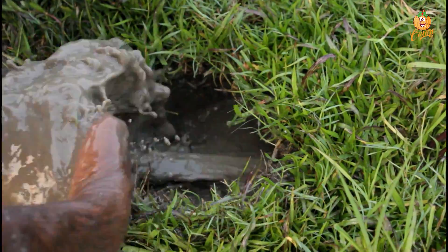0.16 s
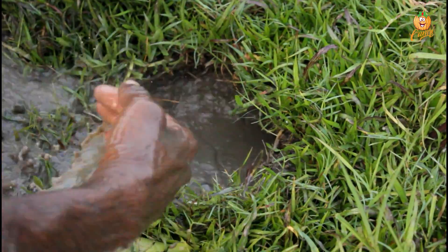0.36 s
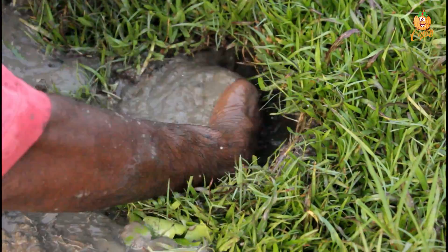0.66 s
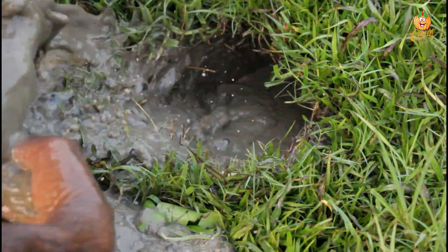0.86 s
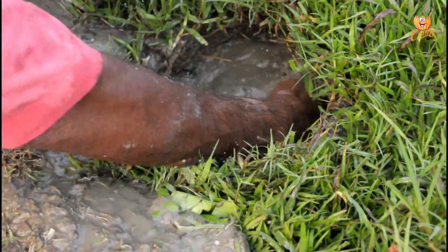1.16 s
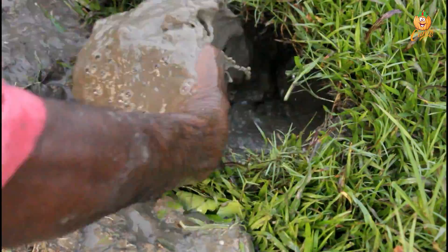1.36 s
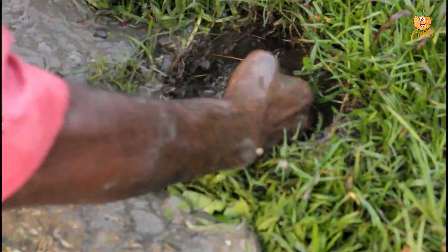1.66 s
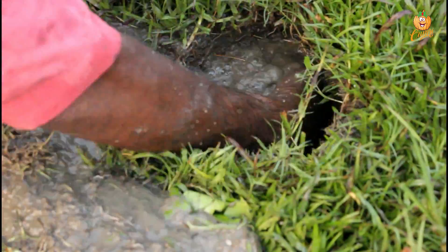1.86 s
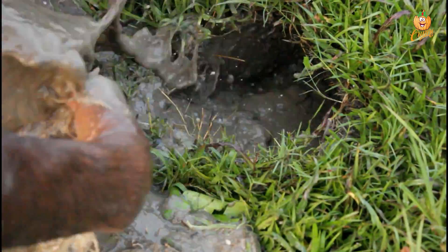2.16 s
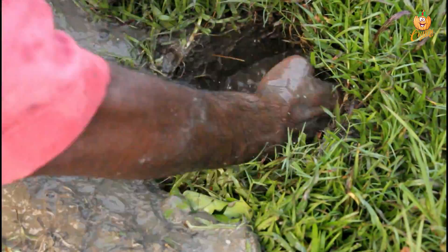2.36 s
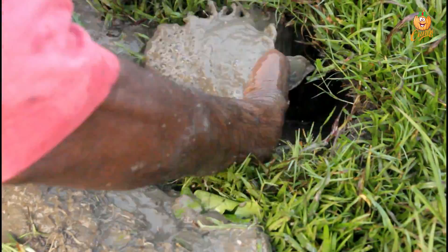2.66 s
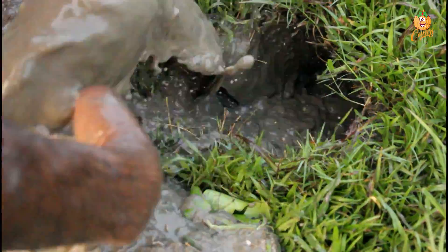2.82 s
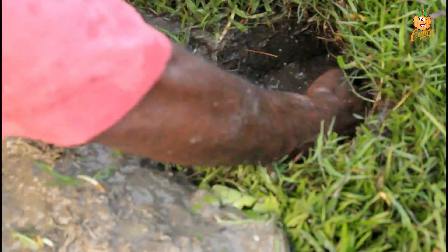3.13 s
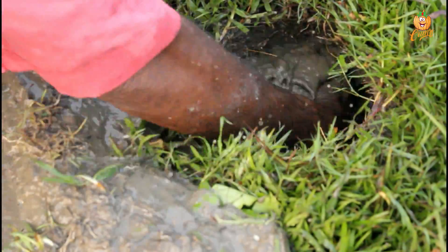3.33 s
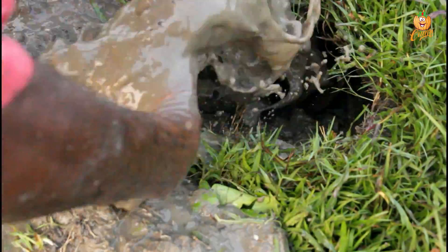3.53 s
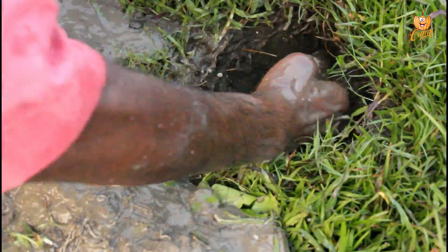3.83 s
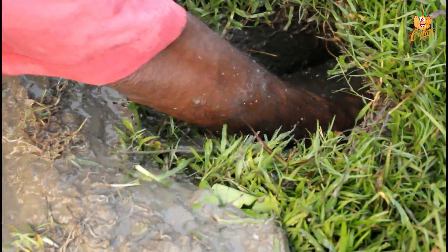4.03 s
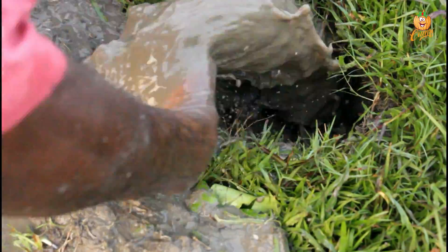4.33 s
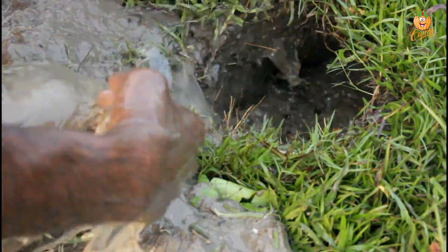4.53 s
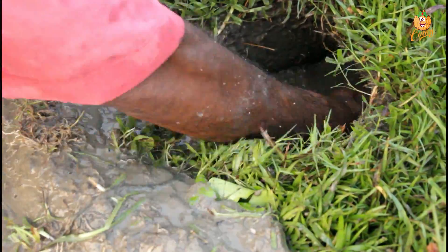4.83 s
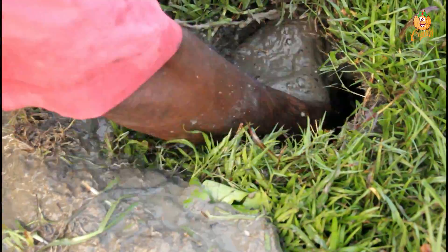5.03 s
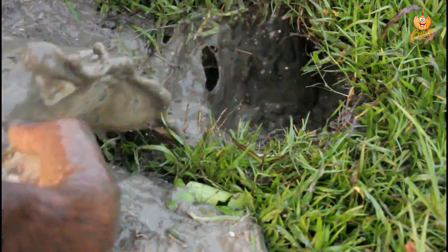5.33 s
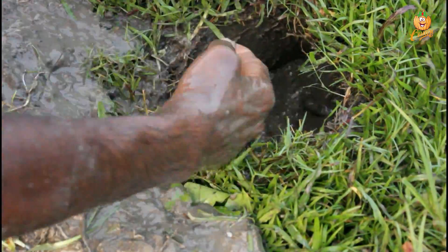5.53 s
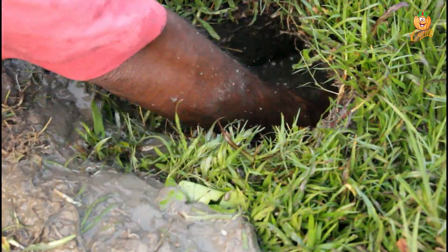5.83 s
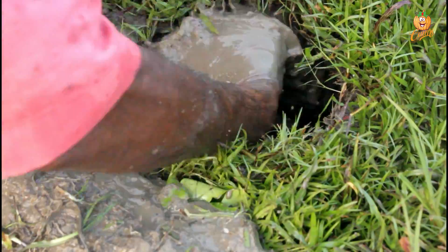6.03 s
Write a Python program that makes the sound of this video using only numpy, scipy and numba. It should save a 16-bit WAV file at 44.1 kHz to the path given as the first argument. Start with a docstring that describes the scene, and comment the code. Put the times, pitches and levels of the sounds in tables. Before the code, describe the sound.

Close outdoors, a hand plunges again and again into a flooded hole, scooping out muddy water. Each scoop gives a wet gurgle with clear bubble plops, then the thrown water lands in a fizzy, spattering splash. Drips trickle between. About nine scoops follow in uneven rhythm for six seconds. The sound is nearly mono, thin in the bass, with only a very short soft tail from the mud banks.

```python
"""A flooded hole in the grass, in open air: a hand close by scoops out muddy water.
Scoops trap air that rings as short bubbles: decaying, gliding sines, a few prominent among many small ones.
Thrown water lands as fizz (small high bubbles), spray (patchy hiss with grains) and splats (noise puffs).
Resonant noise makes the hole boom faintly and the mud banks add a short tail. The sound is nearly mono, with
a strong low cut and only a trace of slosh and moving air."""
import sys
import numpy as np
from scipy import signal
from scipy.fft import rfft, irfft
from scipy.io import wavfile
from scipy.ndimage import uniform_filter1d
from numba import njit

SR = 44100
rng = np.random.default_rng(int(sys.argv[2]) if len(sys.argv) > 2 else 0)


def transcribe(u):
    """Save the signal u as a 16-bit wav file named by the first command-line argument.

    u: samples, shape (n,) or (channels, n), limited to [-1, 1]; the rate is SR.
    q: integer samples, one column per channel.
    """
    v = np.clip(np.atleast_2d(u).T, -1, 1)
    q = np.round(v * 32767).astype(np.int16)
    wavfile.write(sys.argv[1], SR, q)


N = 272538

# spectrum of spray and splats: f/Hz, relative level per Hz/dB
SPRAY_SPECTRUM = [(1500, -25.5), (3000, -12), (5000, -16), (7000, -16.5), (10000, -21), (15000, -25.5),
                  (17000, -29)]


def undb(db):
    """Amplitude ratio of a level: 20 dB are a factor of ten."""
    return 10 ** (np.asarray(db) / 20)


def unit(x):
    """Normalise to a root-mean-square (RMS) of 1."""
    return x / np.sqrt(np.mean(x ** 2))


def colour(x, points):
    """Spectral shaping: levels interpolated over log frequency multiply the spectrum."""
    hz, db = np.transpose(points)
    log_hz = np.log(np.maximum(np.arange(N // 2 + 1) * SR / N, 1))
    return irfft(rfft(x) * undb(np.interp(log_hz, np.log(hz), db, left=-80)), N)


def walk(rate):
    """Band-limited fluctuation: random values held 1 / rate s and slewed, of unit RMS."""
    held = int(SR / rate)
    steps = np.repeat(rng.standard_normal(N // held + 1), held)
    return unit(uniform_filter1d(steps, held // 2 + 1)[:N])


def patches(rate, depth_db):
    """Amplitude modulation: a gain whose level wanders with an RMS of depth_db."""
    return undb(depth_db * walk(rate))


def surge(start, hold, db, drift_db_s, rise_s, fade_s):
    """Exponential growth and decay, straight in dB: rise up to the start, drift through the hold, fade.

    Rise and fade are times per 60 dB; the gains of all surges add."""
    coarse = np.arange(0, N, 32)
    u = coarse / SR - start[:, None]
    hold, db, drift, rise, fade = (np.reshape(v, (-1, 1)) for v in (hold, db, drift_db_s, rise_s, fade_s))
    before = 60 * u / rise
    after = drift * np.minimum(u, hold) - 60 * np.maximum(u - hold, 0) / fade
    gain = undb(db + np.where(u < 0, before, after)).sum(axis=0)
    return np.interp(np.arange(N), coarse, gain)


@njit
def ring(n, peak, size, step, tau, glide, phase):
    """Damped oscillation of bubbles: sines swell for 2 tau samples, die away and glide as the air pocket moves."""
    y = np.zeros(n)
    for k in range(len(peak)):
        start, p = int(peak[k] - 2 * tau[k]), phase[k]
        for i in range(int(11 * tau[k])):
            u = i / tau[k]
            p += step[k] * (1 + glide[k] * (u - 2))
            if 0 <= start + i < n:
                # the envelope is 1 at u = 2
                y[start + i] += size[k] * u * u / 4 * np.exp(2 - u) * np.sin(p)
    return y


def swarm(lo_hz, hi_hz, cycles, scatter_db, patchy_db, count):
    """Superposition of many unseen bubbles with random times, pitches, lengths and slight glides, a few larger.

    The pitch range may move; tau is 0.4 to 1.8 times the given cycles."""
    when, pitch, length, big, rise, phase = rng.random((count, 6)).T
    at = (when * N).astype(int)
    lo, hi = (np.broadcast_to(edge, N)[at] for edge in (lo_hz, hi_hz))
    hz = lo * (hi / lo) ** pitch
    tau = cycles * (0.4 + 1.405 * length ** 2) * SR / hz
    # exponential scatter of the level, cut off at the top
    size = undb(-scatter_db * np.log(1 - big * (1 - 1 / 150)))
    glide = 0.057 * (rise - 0.35)
    sound = ring(N, when * N, size, 2 * np.pi * hz / SR, tau, glide, 2 * np.pi * phase)
    return unit(patches(45, patchy_db) * sound)


def rumble(big, small, fizz, empty):
    """Band-passed noise: low slosh follows the water, over a trace of moving air."""
    band = signal.butter(2, [28, 420], "band", fs=SR, output="sos")
    slosh = unit(signal.sosfilt(band, rng.standard_normal(N)))
    stirring = uniform_filter1d(big + 0.51 * small + 0.21 * fizz, size=2500)
    level = undb(-49 + 3.9 * empty) * stirring + undb(-95.5)
    return slosh * patches(36, 1.7) * level


def hole(big, empty):
    """Cavity resonance: big bubbles stir the air column of the hole, more as it empties."""
    centre_hz, width_hz = 249, 140
    b, a = signal.iirpeak(centre_hz, centre_hz / width_hz, fs=SR)
    boom = unit(signal.lfilter(b, a, rng.standard_normal(N)))
    return undb(8 * empty - 37.5) * big * boom


def banks(x):
    """Diffuse scattering: the mud banks return each sound as a short soft tail of decaying noise."""
    tail_db, t60_s = -14, 0.15
    t = np.arange(8000) / SR
    decay = undb(-60 * t / t60_s) * (t > 0.002)
    tail = rng.standard_normal(len(t)) * patches(200, 1.7)[:len(t)] * decay
    tail = tail / np.sqrt(np.sum(tail ** 2))
    return x + undb(tail_db) * signal.fftconvolve(x, tail)[:N]


def trickles():
    """Exponential surges as water runs off hand and grass: gains of small bubbles, fizz and spray."""
    # t/s, hold/s, small-bubble level/dB; relative to that: fizz level/dB, spray level/dB
    trickle_table = [(0.601, 0.095, -45.5, 2.5, -13.5), (0.931, 0.13, -83, -1, 23),
                     (1.27, 0.042, -60, -10.5, -1), (1.5, 0.076, -75, -2, 8.5),
                     (2.082, 0.064, -47.5, 5.5, -5), (2.254, 0.013, -62.5, 4, 6),
                     (2.831, 0.19, -55.5, 7.5, -7), (4.8, 0.044, -71.5, 10, 13.5),
                     (5.589, 0.05, -44, -18, -6), (5.72, 0.074, -71.5, -5, 4.5)]
    s, hold, db, fizz, fine = np.array(trickle_table, float).T
    rise_s, fade_s = 0.052, 0.22  # per 60 dB
    return [surge(s, hold, db + over, 0, rise_s, fade_s) for over in (0, fizz, fine)]


def spray(grain_db, patchy_db):
    """Modulated broadband noise of fine droplets: patchy hiss full of tiny bursting bubbles."""
    low, high = (patches(90, patchy_db) * colour(rng.standard_normal(N), SPRAY_SPECTRUM) for _ in range(2))
    # the hiss above 9 kHz flickers on its own
    split = signal.butter(2, 9000, fs=SR, output="sos")
    high = high * patches(14, 2.6)
    hiss = signal.sosfilt(split, low - high) + high
    shared = patches(60, patchy_db) * patches(240, 1.9)
    grains = swarm(5000, 15000, 1.6, 3.4, 0.42, count=9000)
    return unit(shared * (unit(hiss) + undb(grain_db) * grains))


def splats(crest_db=-6, rise=0.96):
    """Impact noise: drops splat on mud and grass as quick puffs; longer puffs also swell more slowly."""
    # t/s, relative level/dB (ahead of crest_db and the puff shape), decay time constant/ms
    splat_table = [(0.107, -25, 2.2), (0.239, -26.5, 4.4), (0.349, -15, 5.3), (0.397, -25.5, 26),
                   (0.454, -16, 7.2), (0.56, -10.5, 3.3), (0.618, -20, 4.5), (0.928, -27, 2.3),
                   (1.017, -44, 4.2), (1.043, -14, 3.3), (1.075, -8, 7), (1.163, -13.5, 4.4),
                   (1.2305, -11.5, 2.2), (1.37, -35, 9.6), (1.639, -21.5, 18), (1.673, -14, 11.3),
                   (1.702, -11, 11), (1.811, -5.5, 3.4), (1.874, -17.5, 3.8), (1.957, -36, 14),
                   (2.004, -29.5, 1.7), (2.36, -13, 14), (2.4294, -14.5, 14), (2.707, -41, 5.7),
                   (2.833, -47, 3.1), (3.046, -15, 66), (3.092, -12, 2.5), (3.157, -16.5, 6.5),
                   (3.455, -36, 15), (3.641, -22.5, 7.3), (3.703, -8.5, 2.5), (3.786, -11.5, 5.8),
                   (3.843, -10, 14), (3.936, -18.5, 9.4), (4.377, -23, 6.2), (4.506, -16, 11.4),
                   (4.591, -11.5, 2.8), (4.6465, -10, 4.1), (5.042, -24, 5.9), (5.482, -12, 2.8),
                   (5.715, -24.5, 2.7), (6.092, -33.5, 18)]
    shape, ms = np.zeros(N), np.arange(2500) * 1000 / SR
    for s, db, fade in splat_table:
        i = int(s * SR)
        puff = (1 - np.exp(-ms / (rise * fade))) * np.exp(-ms / fade)
        shape[i:i + len(ms)] += undb(db + crest_db) * puff[:N - i]
    return shape * unit(colour(rng.standard_normal(N), SPRAY_SPECTRUM))


def landings():
    """Exponential surges as thrown water comes down: gains of big bubbles, small bubbles, fizz and spray."""
    # t/s, hold/s, fizz level/dB, swell over the hold/dB; relative to the fizz: big-bubble level/dB,
    # small-bubble level/dB, spray level/dB; build-up/s and fade/s per 60 dB, ahead of the shares below
    landing_table = [(0.0, 0.052, -41.5, -4, -1.5, 1.5, -5, .2, 0.2),
                     (0.346, 0.18, -45, 14, -25, -1.5, -3, 0.23, 0.4),
                     (1.072, 0.12, -35, 0, -22, 0, -4.5, 0.37, 0.29),
                     (1.661, 0.13, -40.5, 14.5, -31, -2.5, -6, 0.24, 0.43),
                     (2.332, 0.15, -34, 5, -30.5, -6.5, -6.5, 0.24, 0.33),
                     (3.06, 0.13, -39, -4.5, -19, 2, 1, 0.31, 0.3),
                     (3.792, 0.11, -34, 4, -40, -11, -7, 0.4, 0.51),
                     (4.601, 0.12, -34.5, 0.5, -14, -3.5, -1, 0.24, 0.21),
                     (5.27, 0.15, -43.5, 11, -32, -4, -10, 0.23, 0.24),
                     (5.47, 0.076, -38, 7.5, -23.5, 0, -1.5, 0.089, 0.17),
                     (5.956, 0.03, -59, 5, 1, 3.5, 4, 0.048, 0.096)]
    # shares of these times for big, small, fizz, spray
    build_share = [0.93, 0.14, 0.47, 1]
    fade_share = [0.84, 0.8, 0.7, 0.64]
    s, hold, db, swell, big, small, fine, rise, fade = np.array(landing_table, float).T
    return [surge(s, hold, db + over, swell / hold, rise * up, fade * down)
            for over, up, down in zip((big, small, 0, fine), build_share, fade_share)]


def gulps():
    """Exponential surges as pockets of air gulp out: the gain of the big bubbles."""
    # t/s, hold/s, big-bubble level/dB
    gulp_table = [(0.182, 0.018, -32.5), (0.445, 0.11, -46.5), (0.75, 0.047, -45), (0.857, 0.0086, -40),
                  (1.172, 0.016, -50), (1.223, 0.014, -45), (1.352, 0.092, -39), (1.71, 0.054, -49),
                  (1.819, 0.1, -37.5), (1.947, 0.025, -31.5), (2.104, 0.061, -40), (2.636, 0.012, -33.5),
                  (2.848, 0.068, -45), (3.447, .02, -42.5), (3.587, 0.12, -44), (3.84, 0.0065, -35.5),
                  (4.243, 0.012, -51), (4.483, 0.031, -34.5), (5.33, 0.085, -40), (5.871, 0.057, -50),
                  (6.023, 0.085, -47)]
    s, hold, db = np.array(gulp_table, float).T
    rise_s, fade_s = 0.034, 0.11  # per 60 dB
    return surge(s, hold, db, 0, rise_s, fade_s)


def scoops():
    """Exponential surges as the hand plunges and stirs: gains of big bubbles, small bubbles, fizz and spray."""
    # t/s, hold/s, small-bubble level/dB, swell over the hold/dB (ahead of the drift below);
    # relative to the small bubbles: big-bubble level/dB, fizz level/dB, spray level/dB; fade/s per 60 dB
    scoop_table = [(0.114, 0.18, -41, -1.5, -5.5, -12.5, -26.5, 0.23),
                   (0.743, 0.084, -38.5, 2, -6, -5.5, -22, 0.3),
                   (1.344, 0.1, -46, 9.5, -18, -1.5, -21, 0.34),
                   (1.954, 0.081, -35, -2.5, 5.5, -9, -24, 0.34),
                   (2.645, 0.18, -47.5, 6, -10, -15.5, -35.5, 0.34),
                   (3.378, 0.029, -43.5, -4, -16, -5, -16, 0.35),
                   (3.449, 0.048, -36, -2.5, -17, -2, -29, 0.75),
                   (3.554, 0.062, -33.5, -10, -17.5, -1, -16.5, 1),
                   (4.191, 0.26, -46.5, 8, -13.5, -10.5, -16.5, 0.48),
                   (4.91, 0.03, -54.5, -8, -3, -9, -20, 0.12),
                   (5.042, 0.011, -38.5, -14, -11, 9, 0.5, 0.22),
                   (5.106, 0.29, -39, -6.5, -5, -5, -18, 0.16),
                   (5.831, 0.019, -47, -10, -1, -5.5, -9.5, 0.23),
                   (6.018, 0.17, -41, 4.5, -15, -7, -27.5, .3)]
    # added drift/(dB/s) of big, small, fizz, spray: the lifted hand sheds ever finer water
    scoop_drift = [1, 2, 34.5, 55]
    s, hold, db, swell, big, fizz, fine, fade = np.array(scoop_table, float).T
    plunge_s = 0.016  # rise per 60 dB
    return [surge(s, hold, db + over, swell / hold + drift, plunge_s, fade)
            for over, drift in zip((big, 0, fizz, fine), scoop_drift)]


def churn():
    """Superposition of all surges: gains of big bubbles, small bubbles, fizz, spray and the scoops' spray."""
    stirred = scoops()
    gains = np.add(stirred, landings()) + np.array([gulps(), *trickles()])
    return *gains, stirred[3]


def bubbles(glide=0.011, trail_s=0.036, trail_db=-11.5, spread=0.38):
    """Damped resonance of the air bubbles that stand out, each with a trail of weaker ones."""
    # t/s of the peak, peak level/dB, f/Hz, width at half height/ms
    bubble_table = [(0.116, -12, 1470, 0.96), (0.121, -11, 1420, 1.27), (0.121, -13.5, 810, 4.8),
                    (0.216, -24, 1324, 3.8), (0.2981, -27, 1130, 3.6), (0.3668, -21.5, 1650, 1.37),
                    (0.4734, -26.5, 1010, 7.2), (0.4853, -21, 1520, 4.4), (0.5022, -18.5, 1200, 3.9),
                    (0.557, -5.5, 4600, 0.34), (0.557, -20.5, 1630, 2.9), (0.622, -18, 2170, 1.37),
                    (0.7, -30, 3010, 2.3), (0.752, -26.5, 805, 5.8), (0.773, -22.5, 3200, 2.1),
                    (0.7805, -28, 780, 7.1), (0.793, -20.5, 1360, 2.6), (0.811, -36.5, 5550, 8.8),
                    (0.9817, -31.5, 2370, 3.3), (0.9603, -33.5, 5040, 1.6), (1.002, -28, 5280, 1.5),
                    (1.0739, -18, 2300, 2), (1.087, -6, 1870, 1.5), (1.093, -22.5, 1260, 5.9),
                    (1.139, -22.5, 2240, 3.2), (1.1785, -16, 1510, 1.17), (1.3298, -14.5, 1587, 3.4),
                    (1.3599, -25, 630, 3.2), (1.3701, -29, 834, 7.5), (1.4065, -19, 1760, 1.9),
                    (1.41, -23, 1334, 5.7), (1.7096, -10.5, 1836, 3.8), (1.7606, -24, 1740, 4.1),
                    (1.77, -16, 1470, 1.17), (1.8182, -20, 2960, 1), (1.8211, -11.5, 1820, 0.92),
                    (1.945, -26, 1180, 3.8), (1.957, -29, 795, 4), (1.9625, -18.5, 570, 3.5),
                    (1.9664, -26, 1560, 3.2), (1.9762, -18, 1400, 1.6), (1.986, -18.5, 522, 8.6),
                    (2.0049, -16.5, 1920, 2.1), (2.255, -35.5, 2210, 3.75), (2.373, -19, 1810, 2.17),
                    (2.39, -22.5, 1680, 4.5), (2.4609, -13, 2660, 0.78), (2.643, -27, 1220, 4.5),
                    (2.647, -7.5, 1140, 1.86), (2.6621, -30, 724, 2.8), (2.675, -27.5, 1375, 4.4),
                    (2.695, -32.5, 1660, 4.3), (2.72, -29.5, 1760, 3.2), (2.744, -28.5, 1330, 4.6),
                    (2.765, -30.5, 1730, 4.1), (2.813, -38, 1280, 5.3), (2.8219, -31, 3200, 1.1),
                    (2.836, -30, 7560, 1.7), (2.866, -27.5, 920, 2.1), (2.88, -28, 3430, 1.3),
                    (2.9077, -38, 993, 12), (3.016, -32.5, 2030, 2.3), (3.0731, -14, 5200, 0.65),
                    (3.093, -22, 2180, 2.9), (3.096, -14.5, 1850, 4.3), (3.355, -42.5, 3130, 1.6),
                    (3.386, -27, 1795, 3), (3.391, -25, 1710, 2.1), (3.376, -40.5, 5770, 1.5),
                    (3.4205, -33.5, 1750, 2.4), (3.455, -25.5, 1350, 3.1), (3.4632, -22.5, 1230, 5.1),
                    (3.4753, -22.5, 2610, 2.5), (3.558, -22, 3140, 2.3), (3.569, -22.5, 1766, 4),
                    (3.597, -26, 1050, 4.1), (3.611, -21.5, 2380, 2.57), (3.66, -33.5, 449, 14),
                    (3.7897, -18, 2560, 3.3), (3.8505, -17.5, 2440, 2.4), (3.851, -17, 5230, 1.2),
                    (3.853, -26.5, 560, 4.3), (3.871, -14.5, 1550, 1.9), (3.8808, -18.5, 2170, 3.2),
                    (3.8907, -18, 5640, 0.24), (3.9379, -13.5, 4400, 0.34), (4.0236, -36.5, 1260, 2.4),
                    (4.1184, -44, 3630, 2.2), (4.1193, -37, 10150, 1.2), (4.1542, -38, 1480, 2.67),
                    (4.192, -30, 1525, 3.7), (4.2561, -36, 747, 10), (4.241, -32, 1750, 1.8),
                    (4.249, -27.5, 1720, 4), (4.2897, -20, 3000, 2.2), (4.298, -17, 1750, 2.7),
                    (4.3203, -21.5, 1170, 2.3), (4.3736, -23.5, 1840, 4.2), (4.3822, -14, 4600, 0.48),
                    (4.388, -26, 1630, 2.8), (4.404, -16.5, 4670, 0.56), (4.5134, -10, 3970, 0.52),
                    (4.5949, -20, 1780, 3), (4.6536, -18.5, 1740, 4.3), (4.666, -17.5, 2460, 1.8),
                    (4.711, -13, 2260, 1.28), (4.871, -45, 2340, 3.2), (4.8876, -44.5, 503, 4.5),
                    (4.9167, -15.5, 2540, 1.83), (4.943, -45, 2500, 3), (4.967, -46, 990, 3.3),
                    (4.984, -45.5, 2750, 5), (5.0505, -31, 4340, 1.1), (5.063, -34, 4000, 1.3),
                    (5.118, -23, 1740, 3.5), (5.125, -21, 1560, 4.5), (5.1704, -27.5, 1250, 7.2),
                    (5.1929, -21, 3460, 1.9), (5.3254, -27, 1070, 2.9), (5.3516, -20, 1490, 1.1),
                    (5.378, -21.5, 438, 5.7), (5.3824, -18.5, 1120, 2.6), (5.4112, -28.5, 3900, 3.2),
                    (5.431, -24.5, 2460, 1.1), (5.478, -19.5, 1050, 1.95), (5.481, -19, 2240, 0.58),
                    (5.5281, -18.5, 1124, 4.4), (5.5446, -20.5, 1056, 4.34), (5.6169, -18.5, 1210, 3.7),
                    (5.663, -29, 5140, 0.5), (5.715, -28.5, 4660, 0.62), (5.833, -29.5, 1960, 2.04),
                    (5.846, -33.5, 2280, 1.7), (5.8744, -44, 780, 6.1), (6.0283, -34, 835, 5.6),
                    (6.0443, -29.5, 860, 7.2), (6.064, -29.5, 1790, 4.2), (6.156, -31, 1730, 3.3),
                    (4.3, -43, 276, 36), (4.359, -43.5, 245, 77), (5.191, -53, 254, 85),
                    (6.065, -38, 266, 35), (6.14, -39.5, 244, 65), (1.96, -31.5, 6300, 1.1),
                    (2.008, -36, 7800, 1.7), (2.091, -32, 3520, 3.6), (0.0077, -40, 1680, 4.3),
                    (0.3403, -34, 2360, 4.1), (0.353, -29, 4900, 1.4), (0.5576, -24.5, 2060, 3.6),
                    (0.5576, -15, 5970, 1.2), (0.5595, -19, 3350, 1.8), (0.5655, -18, 6900, 0.9),
                    (0.6203, -23.5, 2710, 2.5), (0.763, -27.5, 2930, 2.8), (0.805, -27, 2580, 3.0),
                    (0.8185, -29.5, 1030, 5.8), (0.8281, -31.4, 2350, 5.4), (1.0844, -20, 4390, 1.5),
                    (1.1707, -23.5, 1744, 4.7), (1.1746, -20.5, 4400, 1.5), (1.408, -26.5, 2900, 2.8),
                    (1.7085, -20.5, 2800, 2.1), (1.8176, -20, 6600, 2.3), (1.8211, -19, 3780, 1.6),
                    (2.2543, -26, 7200, 1.0), (2.371, -22, 4740, 1.7), (2.433, -23, 3520, 2.2),
                    (2.451, -29, 3230, 2.1), (2.939, -37.5, 2690, 3.3), (3.3993, -28.5, 1560, 3.6),
                    (3.4582, -32, 2360, 5), (3.4734, -25, 1460, 4.3), (3.564, -28, 1500, 4.9),
                    (3.64, -29, 2860, 2.6), (3.6459, -31, 2620, 4.5), (3.8528, -15.5, 1670, 2.9),
                    (3.89, -19.5, 5600, 1.4), (4.2969, -23.5, 1360, 3), (4.3812, -18, 6760, 0.9),
                    (4.4036, -24, 3880, 1.6), (4.608, -23, 1720, 3.2), (4.6496, -23, 8560, 1.6),
                    (4.6904, -23, 3560, 2.3), (4.7105, -23, 3060, 2.4), (5.0414, -27, 3750, 2.1),
                    (5.0432, -26, 5280, 1.6), (5.1558, -29, 1800, 3.7), (5.2459, -30.5, 2240, 3.1),
                    (5.2626, -26, 4100, 1.3), (5.4781, -25, 1820, 4.1), (5.5353, -21.5, 2360, 3.0),
                    (5.8655, -38.5, 798, 3.6), (5.888, -50, 700, 4), (5.975, -37, 1200, 2),
                    (5.989, -40, 1400, 3.8), (6.0258, -28, 3050, 2.5), (6.041, -34, 1800, 7.3),
                    (6.1465, -37, 1680, 3.4), (6.17, -28, 1730, 3.2)]
    s, db, hz, ms = np.array(bubble_table, float).T
    phase = 2 * np.pi * rng.random(len(s))
    tau = ms * SR / 3400  # the swell is 3.4 tau wide at half height
    step = 2 * np.pi * hz / SR
    glides = np.full(len(s), glide)
    sound = ring(N, s * SR, undb(db), step, tau, glides, phase)
    # each one tears five weaker bubbles of nearby pitch along, the later the fainter
    for _ in range(5):
        late, pitch = rng.random((2, len(s)))
        at = (s + trail_s * (late - 0.15)) * SR
        near = step * np.exp(spread * (pitch - 0.5))
        sound = sound + ring(N, at, undb(db + trail_db * (1 + late)), near, tau, glides, phase)
    return sound


def scene():
    """Superposition of water, hole and rumble, with saturation and a low cut, on two almost equal channels."""
    t = np.arange(N) / SR
    big, small, fizz, fine, shed = churn()
    empty = t / t[-1]  # the hole empties steadily from 0 to 1
    # thrown water breaks into finer bubbles than water stirred in the hole
    thrown = np.clip(1.59 * fine / fizz, 0, 1)
    # the deeper the hollow, the lower its biggest bubbles
    water = undb(-6.0) * big * swarm(540 - 200 * empty, 1112, 1.476, 2.84, 3.1, count=2200)
    water += undb(-1.0) * small * swarm(1064, 2790, 2.409, 2.8, 2.58, count=8500)
    water += undb(-2.0) * fizz * thrown * swarm(2600, 6500, 2.1, 4.6, 3.2, count=12000)
    water += undb(-3.5) * fizz * (1 - thrown) * swarm(2300, 4600, 3.7, 2.7, 2.1, count=9000)
    # bubbles of all sizes are squeezed out together, in clumps
    water *= unit(patches(110, 3.12))
    # what the scooping hand sheds is mostly separate droplets, duller than the spray of a landing
    water += undb(-2.4) * shed * swarm(3600, 8500, 3.6, 3.2, 2.2, count=8000)
    water += (fine - 0.85 * shed) * spray(grain_db=0.87, patchy_db=3.2)
    water += splats()
    # mud makes even the clearest bubbles ring unevenly
    water += bubbles() * unit(patches(350, 3.06))
    # the capsule rounds the loudest peaks ahead of the low cut
    ceiling = 0.47
    heard = ceiling * np.tanh(banks(water) / ceiling)
    low_cut = signal.butter(4, 534, "high", fs=SR, output="sos")
    # boom and rumble join after the low cut
    mid = signal.sosfilt(low_cut, heard) + hole(big, empty) + rumble(big, small, fizz, empty)
    # the balance of the two channels wavers very slightly
    side = undb(-39) * mid * walk(40)
    return np.array([mid + side, mid - side])


def record(dry):
    """Elliptic low-pass filtering: a steep edge at 16750 Hz cuts the top."""
    top_cut = signal.ellip(10, 0.2, 80, 16750, fs=SR, output="sos")
    return signal.sosfilt(top_cut, dry)


dry = scene()
out = record(dry)
transcribe(out)
```